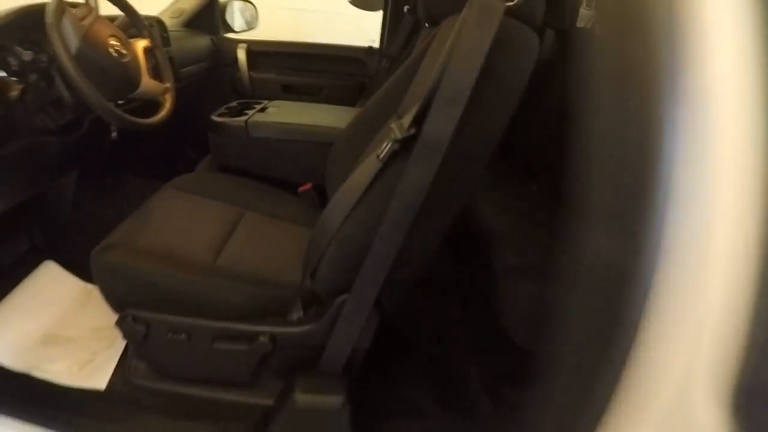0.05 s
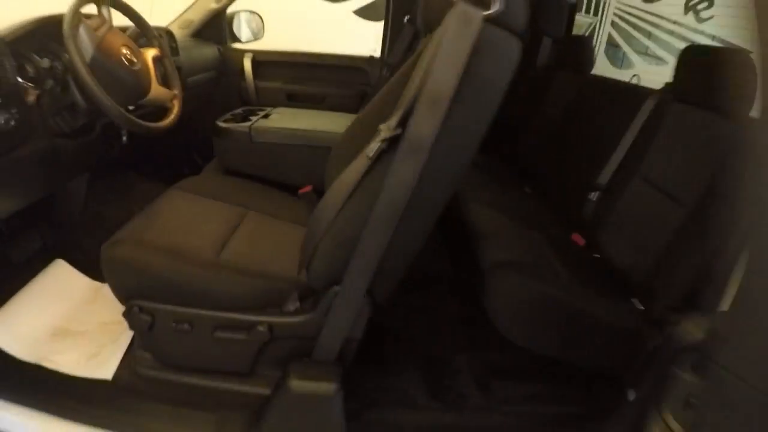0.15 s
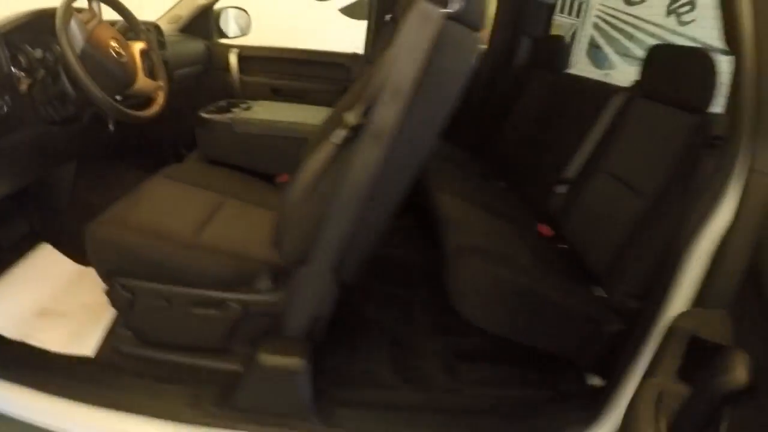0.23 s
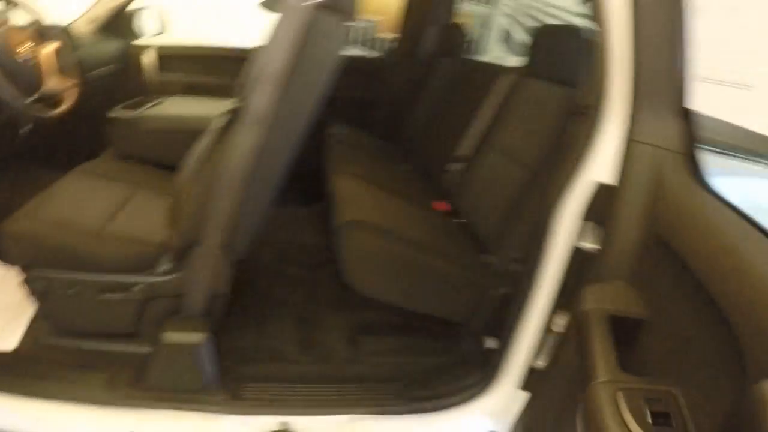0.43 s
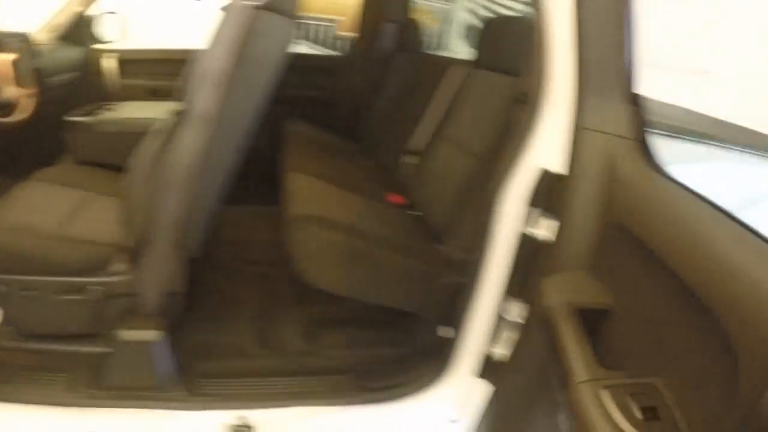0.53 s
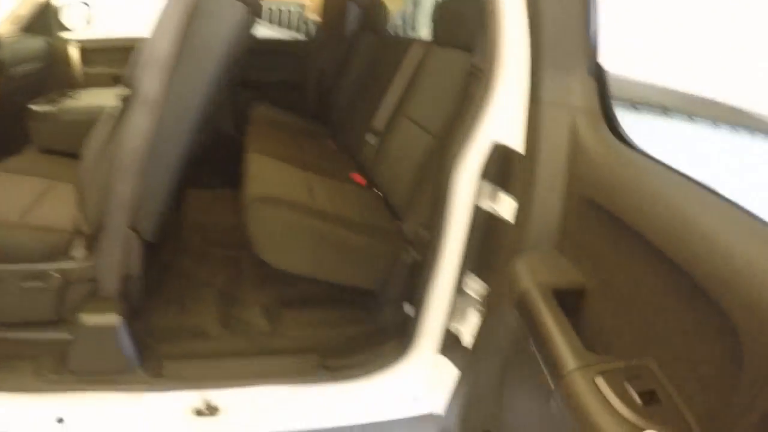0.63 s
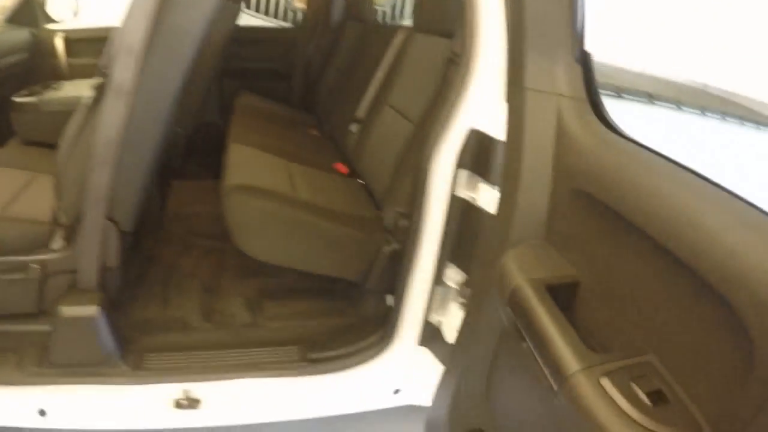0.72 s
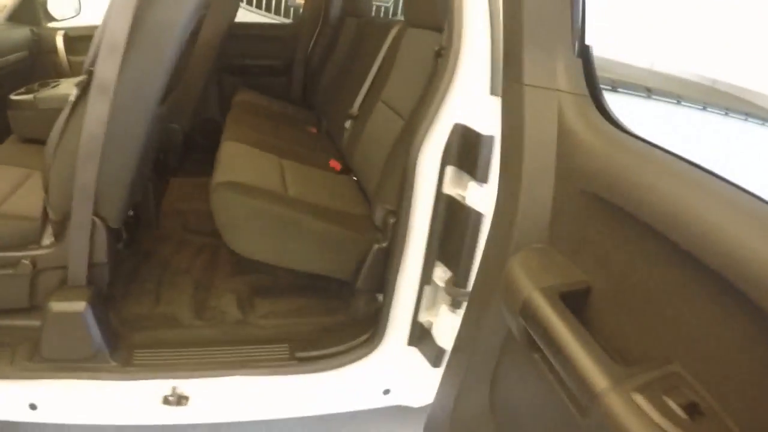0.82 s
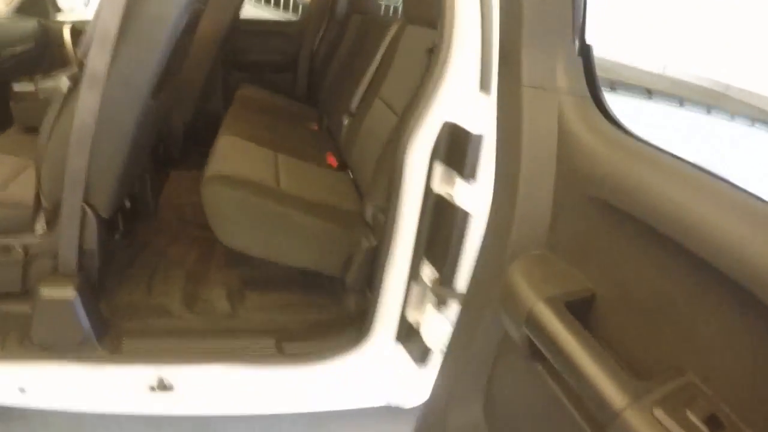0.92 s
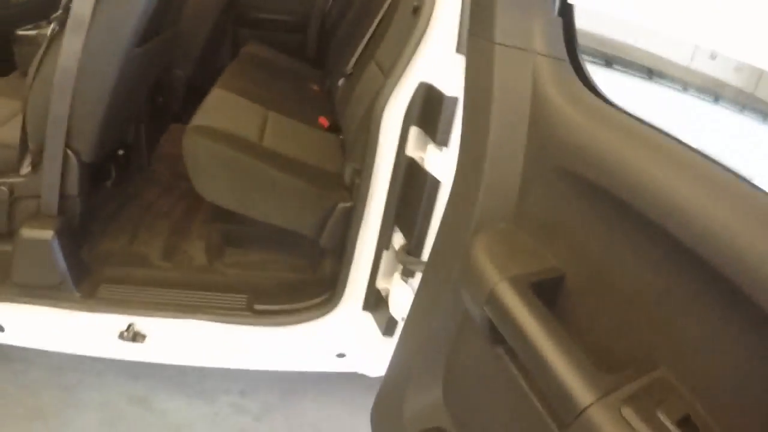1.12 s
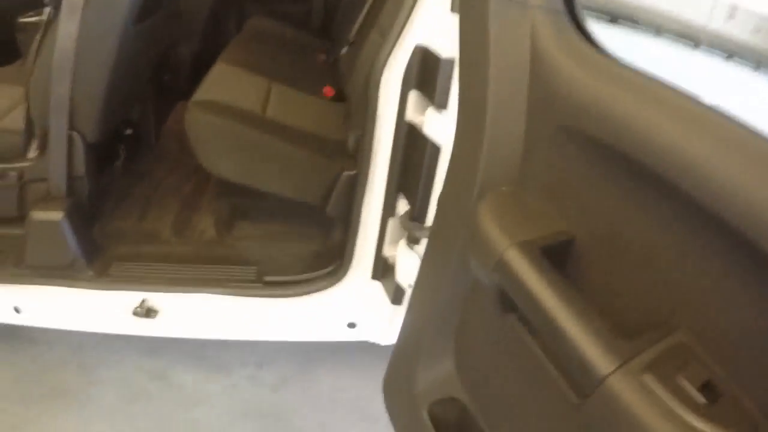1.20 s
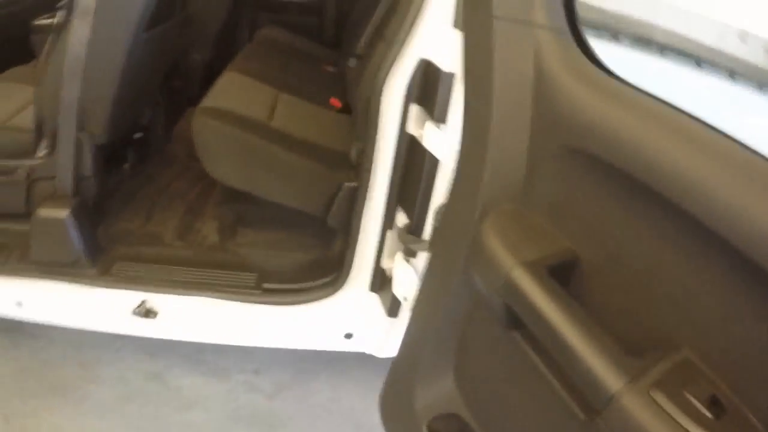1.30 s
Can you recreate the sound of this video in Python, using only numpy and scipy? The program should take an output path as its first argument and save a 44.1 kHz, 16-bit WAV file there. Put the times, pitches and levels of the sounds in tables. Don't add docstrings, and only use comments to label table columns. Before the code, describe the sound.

A pickup door latch snaps open at about 0.2 seconds, a loud, hard cluster of steel clicks with a short metallic ring and echoes off nearby cars. Soft hollow panel knocks follow from 0.35 to 0.6. Near 0.9 the door thuds dully on its hinge stop and shudders, with seal rustle, then small knocks and ticks until 1.35. Faint air hiss, low wind and a thin high electronic whine continue underneath.

```python
import sys
import numpy as np
from scipy import signal
from scipy.fft import irfft
from scipy.io import wavfile
from scipy.ndimage import uniform_filter1d

SR = 44100
rng = np.random.default_rng(int(sys.argv[2]) if len(sys.argv) > 2 else 0)


def boost(x):
    u = np.asarray(x, float) / 20
    return 10 ** u


def put_to_file(sound):
    columns = np.atleast_2d(sound).T
    safe = np.clip(columns, -1, 1)
    whole_steps = np.round(safe * 32767)
    wavfile.write(sys.argv[1], SR, whole_steps.astype(np.int16))


N = 59535


def evened(x):
    return x / np.sqrt(np.mean(x ** 2) + 1e-20)


def smoothed(x, size):
    return uniform_filter1d(uniform_filter1d(x, size=size), size=size)


def add(mix, start_s, sound):
    part = mix[round(start_s * SR):][:len(sound)]
    part += sound[:len(part)]


def read_curve(points, hz, left=None, right=None):
    point_hz, value = np.transpose(points)
    return np.interp(np.log(hz + 1), np.log(point_hz), value, left=left, right=right)


def coloured(points, patchy_db):
    frames, hz = N // 256 + 5, np.fft.rfftfreq(1024, 1 / SR)
    real, imag, patches = rng.standard_normal((frames, 513, 3)).T
    patches = uniform_filter1d(patches, size=12, axis=0)
    patches = evened(uniform_filter1d(patches, size=10, axis=1))
    level_db = read_curve(points, hz, left=-60)[:, None] + patchy_db * patches
    noise = signal.istft((real + 1j * imag) * boost(level_db), nperseg=1024, noverlap=768)[1]
    return evened(noise[:N])


def resonate(x, hz, width_hz):
    turn = np.exp(2j * np.pi * hz * np.arange(len(x)) / SR)
    r = np.exp(-np.pi * width_hz / SR)
    return 2 * (turn * signal.lfilter([1 - r], [1, -r], x / turn)).real


def band(x, hz, width_hz):
    return evened(resonate(resonate(x, hz, width_hz), hz, width_hz))


def ring(hz, db, t60_s, rise_s, phase=0):
    t = np.arange(SR) / SR
    envelope = boost(db - 60 * t / t60_s) * (1 - np.exp(-t / rise_s))
    return envelope * np.sin(2 * np.pi * (hz * t + phase))


def struck(blows, modes, rise_s, spread_db):
    out = np.zeros(N)
    for start_s, level_db, tilt_db in blows:
        for (hz, mode_db, t60_s), (luck, phase) in zip(modes, rng.random((len(modes), 2))):
            db = level_db + mode_db + tilt_db * np.log2(hz / 1000) + spread_db * (luck - 0.5)
            add(out, start_s, ring(hz, db, t60_s, rise_s, phase))
    return out


def cracks(blows, colour, over_db, t60_s):
    noise, envelope, t = coloured(colour, 1.6), np.zeros(N), np.arange(N) / SR
    for start_s, db, _ in blows:
        since = np.maximum(t - start_s, 0)
        envelope += boost(db + over_db - 60 * since / t60_s) * np.minimum(since / 0.00019, 1)
    return noise * envelope


# pitch_hz [Hz], level_db [dB per Hz]
AIR_HISS = [(60, -10.5), (100, -0.5), (300, -11.5), (700, -18), (1700, -20), (4000, -23), (8000, -32.5),
            (15300, -39.5)]


def air_hiss():
    return boost(-58) * coloured(AIR_HISS, 0.99)


# pitch_hz [Hz], level_db [dB per Hz]
WIND_RUMBLE = [(15, -8), (30, -2), (50, 4.5), (80, -8.5), (140, -34), (250, -39)]


def wind():
    return boost(-59.5) * coloured(WIND_RUMBLE, 2.7)


# pitch_hz [Hz], width_hz [Hz], level_db [dB]
SEAL_BODY = [(500, 1470, 5), (1616, 190, 1.5), (2500, 270, -4.5), (3500, 580, -0.5), (5840, 3700, -13)]
# start_s [s], level_db [dB]
DOOR_MOTION = [(0, -57.5), (0.169, -59.5), (.22, -51.5), (.45, -70), (0.618, -82), (.75, -76),
               (0.841, -63.5), (.9, -56), (1.04, -62), (1.12, -60.5), (1.19, -65.5), (1.24, -56.5),
               (1.3, -69.5), (1.35, -80)]


def rustle():
    grain_size = np.minimum(rng.exponential(1, N // 80 + 1), 3).repeat(80)[:N]
    grains = rng.standard_normal(N) * boost(1.9 * grain_size)
    body = sum(boost(db) * band(grains, hz, width_hz) for hz, width_hz, db in SEAL_BODY)
    return evened(body) * boost(np.interp(np.arange(N) / SR, *np.transpose(DOOR_MOTION)))


def whine():
    whine_hz, frames_per_s, start_s, share = 12407, 29.97, 0.0015, 0.45
    t = np.arange(N) / SR
    singing = ((t - start_s) * frames_per_s) % 1 < share
    gate = uniform_filter1d(1.0 * singing, size=30)
    return boost(-70) * gate * np.sin(2 * np.pi * whine_hz * t)


# start_s [s], level_db [dB], pitch_hz [Hz], t60_s [s]
HINGE_WOBBLES = [
    (0, -35.5, 36.8, 0.28),
    (0.372, -42.5, 45, 0.14),
    (0.479, -44, 61.3, 0.51),
    (0.599, -44, 37, 0.44),
    (0.921, -33.5, 31.24, 0.65),
    (1.089, -40.5, 45.5, 0.17),
    (1.198, -46.5, 37.8, 1),
    (1.29, -54, 30, 0.51),
]


def shudder():
    out = np.zeros(N)
    for start_s, db, hz, t60_s in HINGE_WOBBLES:
        add(out, start_s, ring(hz, db, t60_s, 0.0067))
        add(out, start_s, ring(hz * 2.9, db - 9.5, t60_s * 0.91, 0.035))
    return out


# centre_s [s], level_db [dB], pitch_hz [Hz], length_s [s]
SEAL_SCRAPES = [(0.109, -64.5, 1660, 0.047), (0.163, -70, 5070, 0.016), (0.877, -61.5, 3630, 0.014),
                (0.989, -67, 3070, 0.026), (1.027, -55, 1630, 0.0095), (1.03, -63, 2620, 0.011),
                (1.041, -60.5, 3500, 0.018), (1.043, -55, 1100, 0.015), (1.061, -67, 3500, 0.016),
                (1.095, -68, 6450, 0.0051), (1.1, -63, 1650, .02), (1.132, -60, 1400, 0.043),
                (1.133, -67.5, 6940, 0.0092), (1.242, -65, 4040, .025), (1.245, -67, 2340, 0.012)]


def scrapes():
    out, t = np.zeros(N), (np.arange(4000) - 2000) / SR
    for centre_s, db, hz, length_s in SEAL_SCRAPES:
        grit = band(rng.standard_normal(4000) ** 3, hz, hz * 0.34)
        add(out, centre_s - 2000 / SR, boost(db) * grit * np.exp(-(2 * t / length_s) ** 2))
    return out


# start_s [s], level_db [dB], pitch_hz [Hz], t60_s [s]
DRY_TICKS = [(0.19, -48, 5030, 0.0053), (0.2241, -25.5, 4870, 0.012), (0.2247, -40.5, 11100, 0.023),
             (0.228, -36, 6700, 0.0067), (0.602, -52, 1230, 0.027), (.474, -51, 1100, 0.064),
             (0.9068, -39.5, 3160, 0.02), (.911, -48.5, 3760, 0.043), (1.0259, -68, 2500, 0.016),
             (1.2686, -37.5, 1890, 0.011), (1.2686, -47, 2780, 0.01), (1.269, -46.5, 920, 0.013),
             (1.2685, -68, 9000, .008)]


def ticks():
    out, t = np.zeros(N), np.arange(4000) / SR
    for start_s, db, hz, t60_s in DRY_TICKS:
        burst = band(rng.standard_normal(len(t)), hz, hz * 0.9)
        add(out, start_s, burst * boost(db - 60 * t / t60_s) * np.minimum(t / 0.0004, 1))
    return out


# start_s [s], level_db [dB], pitch_hz [Hz], t60_s [s]
SMALL_PINGS = [(0.23, -57, 540, .04), (.201, -45, 920, 0.038), (0.19, -57, 1150, .02),
               (.2245, -22, 876, 0.034), (.2255, -28, 283, 0.067), (.2245, -38, 430, 0.033),
               (.2243, -17.5, 5410, 0.0099), (.2285, -36, 6900, 0.0055), (.9075, -43, 420, 0.033),
               (.9075, -36, 190, .05), (.9098, -41, 2000, 0.038), (.4715, -40, 309, .04),
               (.2247, -22.5, 3583, 0.032), (0.2244, -25.5, 3187, 0.06), (.2249, -30, 3790, .025),
               (0.2252, -30, 1622, 0.04), (0.2315, -23, 1370, 0.024), (.236, -40, 346, 0.03),
               (.486, -39, 208, 0.16), (0.602, -50.5, 1380, 0.026), (.6022, -57, 1900, .015),
               (.9073, -38, 3500, .01), (0.9092, -51, 4400, 0.0073), (.913, -43, 4600, 0.011),
               (.917, -37, 211, .03), (.922, -43, 1790, 0.022), (1.236, -53, 1240, .03),
               (1.341, -48.5, 450, 0.017), (1.2686, -39.5, 1720, 0.017), (1.1, -44, 2520, 0.011),
               (1.2688, -50, 3400, 0.0087)]


def pings():
    out = np.zeros(N)
    for start_s, db, hz, t60_s in SMALL_PINGS:
        add(out, start_s, ring(hz, db, t60_s, 0.00041))
    return out


# start_s [s], level_db [dB], pitch_hz [Hz], t60_s [s], rise_s [s]
PANEL_KNOCKS = [(0.199, -45.5, 500, 0.15, 0.0068), (0.2219, -41, 500, 0.012, 0.00083),
                (.345, -45, 279.7, 0.18, 0.0087), (0.385, -34, 198, 0.055, 0.0039),
                (0.397, -43.5, 244, 0.066, 0.0032), (0.465, -37, 311.7, 0.11, 0.0038),
                (.472, -40, 240, 0.11, 0.0021), (.482, -47, 523, 0.091, 0.0059),
                (.503, -46, 256.3, 0.25, 0.0089), (0.601, -49.5, 500, 0.035, 0.0021),
                (.763, -52, 753, 0.027, 0.0013), (0.881, -39, 302, 0.15, 0.0093),
                (1.121, -45, 256, 0.075, 0.0056), (1.132, -47, 274, 0.066, 0.001),
                (1.178, -40, 264, 0.047, 0.0034), (1.201, -50, 1173, 0.025, 0.0024),
                (1.229, -47.5, 790, 0.054, 0.0036), (1.234, -46, 1240, 0.05, 0.0036),
                (1.244, -38, 269, 0.031, 0.0039), (1.272, -53, 274, 0.042, 0.0021),
                (1.278, -38.5, 277, 0.04, 0.0018), (1.283, -42, 710, 0.027, 0.0016),
                (1.341, -41, 278, 0.027, 0.0012), (1.341, -45.5, 680, 0.014, 0.0011)]
# ratio [of pitch], level_db [dB]
PANEL_PARTIALS = [(1, 5.5), (1.5, -12), (2.3, -7.5), (3.6, -17)]


def knocks():
    out, t = np.zeros(N), np.arange(SR) / SR
    for start_s, db, hz, t60_s, rise_s in PANEL_KNOCKS:
        flattening = rng.uniform(0.82, 0.89, len(PANEL_PARTIALS))
        for (ratio, part_db), flat in zip(PANEL_PARTIALS, flattening):
            part_hz = hz * ratio * (flat if ratio > 1.01 else 1)
            add(out, start_s, ring(part_hz, db + part_db, t60_s / ratio ** 0.5, rise_s))
        puff = band(rng.standard_normal(SR), hz * 0.9, hz * 0.67)
        add(out, start_s, puff * boost(db - 8 - 60 * t / t60_s) * (1 - np.exp(-t / rise_s)))
    return out


# start_s [s], level_db [dB], brightness_db [dB per octave]
LATCH_SNAPS = [
    (0.2244, -20.5, 3.5),
    (.2250, -21, 0.5),
    (0.2284, -25, 1),
    (0.232, -34.5, -3.5),
    (0.2317, -27.5, -2.5),
]
# pitch_hz [Hz], level_db [dB], t60_s [s]
LATCH_STEEL = [(259, -16.5, 0.042), (355, -12, 0.13), (684, -7, 0.019), (888, -9.5, 0.014),
               (1186, -0.5, 0.032), (1363, -6, 0.026), (1622, -11.5, 0.083), (1786, -10, 0.04),
               (2090, -19, 0.035), (2280, -10.5, 0.036), (3187, -5, 0.018), (3526, -5, 0.03),
               (3730, -13.5, 0.027), (5400, -5.5, 0.0037)]
# pitch_hz [Hz], level_db [dB per Hz]
LATCH_BURST = [(200, -1.5), (350, 3), (1200, -1.5), (2400, -7.5), (3400, -8.5), (4300, -7), (5500, -9.5),
               (15000, -35.5)]


def latch():
    snap = struck(LATCH_SNAPS, LATCH_STEEL, 0.00011, 3.0) + cracks(LATCH_SNAPS, LATCH_BURST, -2.9, 0.024)
    return signal.lfilter(*signal.butter(2, 190, "high", fs=SR), snap)


# pitch_hz [Hz], level_db [dB], t60_s [s]
SKIN_MODES = [(231.4, -39.5, 0.35), (450, -42, 0.035), (713, -41, 0.16), (1076, -53, 0.48),
              (1193, -35, 0.11), (1393, -54, 0.41), (1463, -36, 0.15), (2040, -48, 0.22), (2590, -41, 0.2),
              (2650, -51.5, 0.54), (2970, -52, 0.3), (3175, -36.5, 0.17), (3630, -47, .09),
              (4600, -48, 0.18)]


def skin():
    out = np.zeros(N)
    for hz, db, t60_s in SKIN_MODES:
        waver_db = 3 * evened(smoothed(rng.standard_normal(SR), 600))
        add(out, LATCH_SNAPS[0][0], ring(hz, db, t60_s, 0.0025) * boost(waver_db))
    return out


# pitch_hz [Hz], t60_s [s]
LOT_DECAY = [(200, 0.8), (600, 0.62), (1200, 0.77), (3000, 0.68), (6000, 0.46), (9000, 0.33),
             (14000, 0.036)]


def lot(x):
    gap_s, build_s = 0.0045, 0.0066
    taps, at = np.zeros(SR), np.arange(0, SR - 20, 20)
    taps[at + rng.integers(0, 20, len(at))] = rng.choice([-1.0, 1.0], len(at))
    hz, t, z = signal.stft(taps, SR, nperseg=256)
    decay = boost(-60 * t / read_curve(LOT_DECAY, hz)[:, None])
    tail = signal.istft(z * decay, SR, nperseg=256)[1][:SR]
    tail = tail * np.clip((np.arange(SR) / SR - gap_s) / build_s, 0, 1)
    return signal.fftconvolve(x, tail / np.linalg.norm(tail))[:N]


# pitch_hz [Hz], level_db [dB per Hz]
FAR_COLOUR = [(150, 9.5), (300, 2), (700, -1), (1150, -9), (2000, -2), (3200, 0.5), (4500, -11.5),
              (9000, -26)]


def far_snap():
    spectrum = boost(read_curve(FAR_COLOUR, np.fft.rfftfreq(256, 1 / SR), left=-40, right=-40))
    click = np.roll(irfft(spectrum), 128) * np.hanning(256)
    out = np.zeros(N)
    add(out, LATCH_SNAPS[0][0], boost(-12) * click / np.linalg.norm(click))
    return lot(out)


# start_s [s], level_db [dB], brightness_db [dB per octave]
STOP_BLOWS = [
    (.9065, -30, 0),
    (.9105, -36.5, 0.5),
    (.917, -37, 0),
    (.9225, -42, 8),
    (.933, -43.5, -2),
    (.943, -46.5, -3.5),
]
# pitch_hz [Hz], level_db [dB], t60_s [s]
FRAME_MODES = [(97, -11, 0.16), (130, -12, 0.26), (187, 1, 0.058), (272.7, -5, 0.066), (325, -0.5, 0.06),
               (391, -6, 0.12), (500, 1, 0.017), (625, -8.5, 0.1), (906, -14, 0.13), (1625, -13, 0.058),
               (1793, -11, 0.061), (3400, -14.5, 0.016), (4600, -42, 0.008)]


def hinge_stop():
    return struck(STOP_BLOWS, FRAME_MODES, 0.0006, 10)


# pitch_hz [Hz], level_db [dB per Hz]
STOP_BURST = [(100, 5), (300, 6.5), (700, 4), (1300, -9), (1800, -7.5), (3500, -33), (7000, -41),
              (14000, -67)]


def stop_thumps():
    return cracks(STOP_BLOWS, STOP_BURST, -3.2, 0.045) + cracks(STOP_BLOWS[-1:], STOP_BURST, -2, 0.56)


def scene():
    snap = latch()
    body = hinge_stop() + knocks()
    bursts = stop_thumps() + ticks()
    echo = boost(-12) * lot(bursts + boost(-4.5) * body + boost(-10) * snap) + far_snap()
    steady = air_hiss() + wind() + rustle() + whine()
    small = skin() + pings() + scrapes()
    return (steady + shudder() + snap + body + bursts + echo + small)[None]


def band_limit(x):
    return signal.sosfilt(signal.butter(12, 16420, fs=SR, output="sos"), x)


def record(dry):
    lowpass = signal.firwin(511, 15350, window=("kaiser", 9), fs=SR)
    low = signal.oaconvolve(dry, lowpass[None], "same")
    mix = low + boost(-36) * (dry - low)
    return band_limit(mix)


dry = scene()
out = record(dry)
put_to_file(out)
```